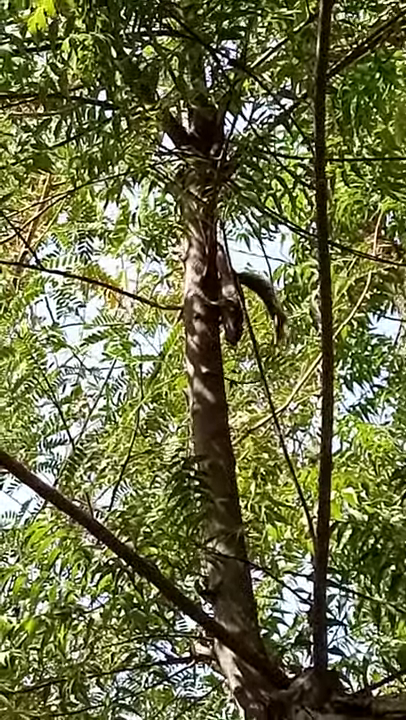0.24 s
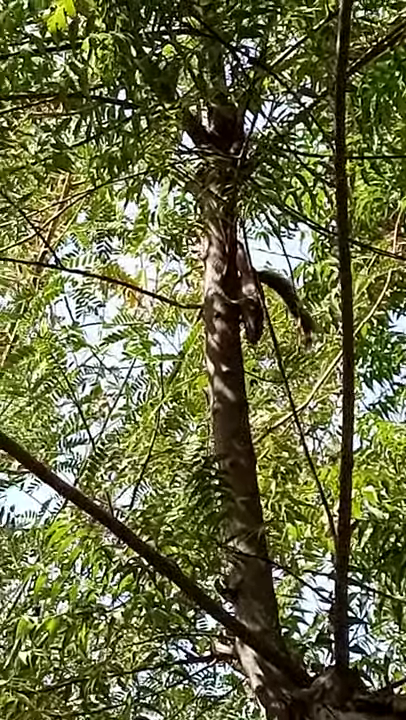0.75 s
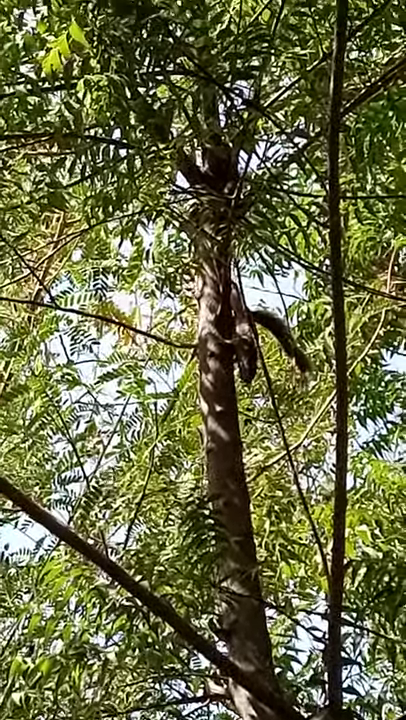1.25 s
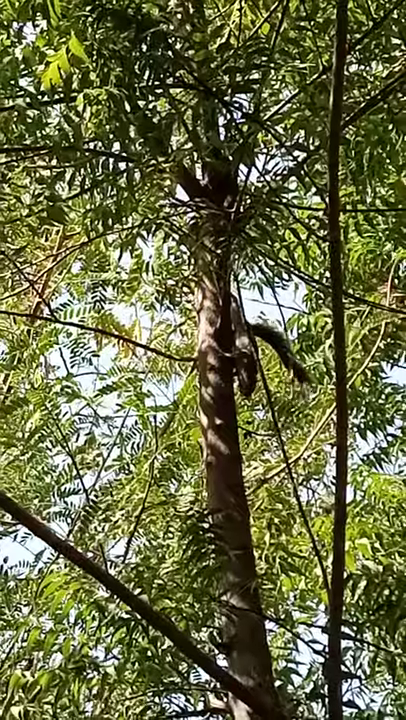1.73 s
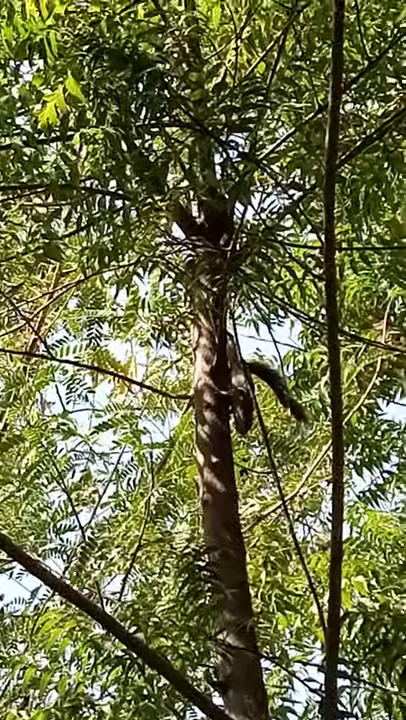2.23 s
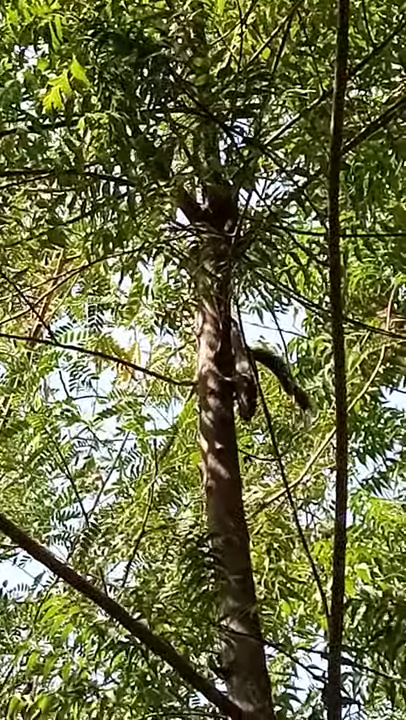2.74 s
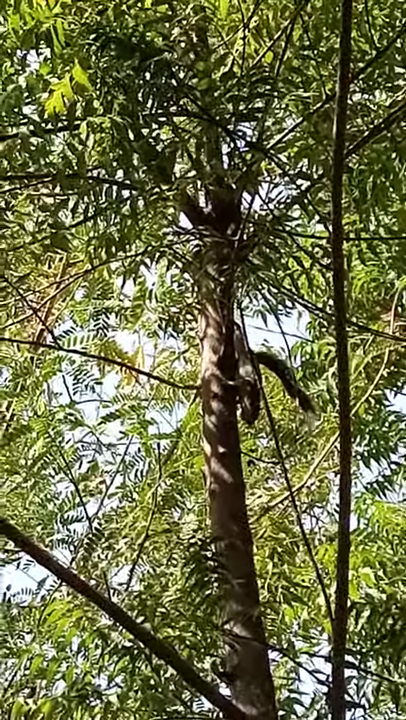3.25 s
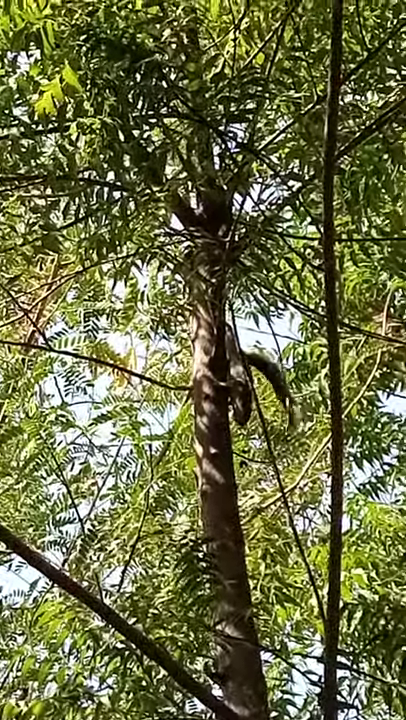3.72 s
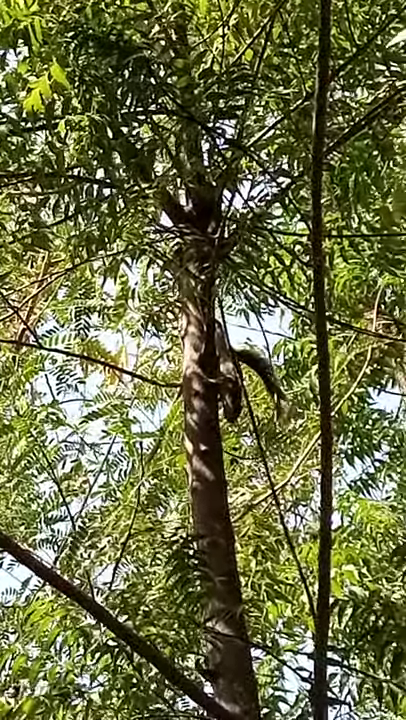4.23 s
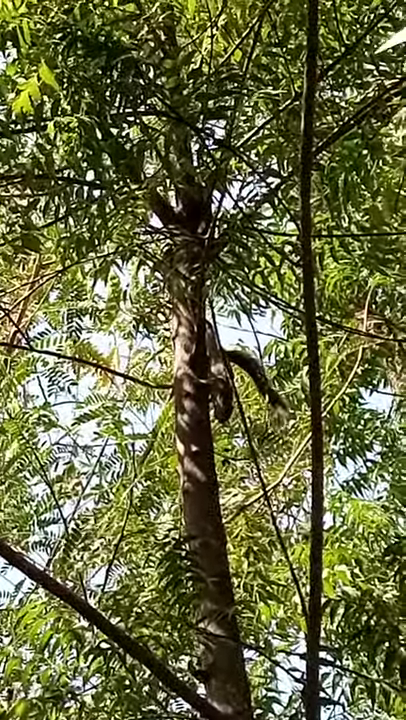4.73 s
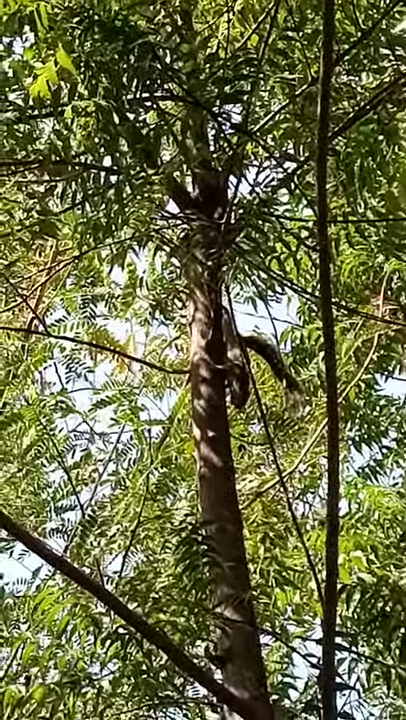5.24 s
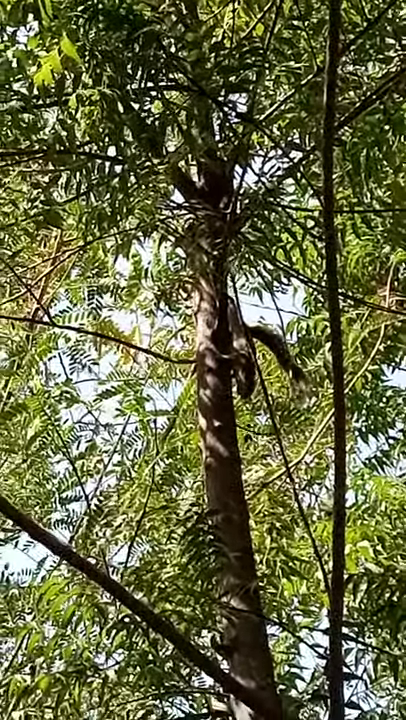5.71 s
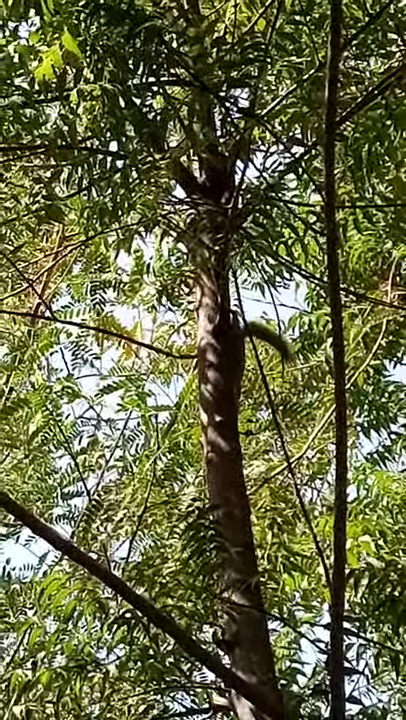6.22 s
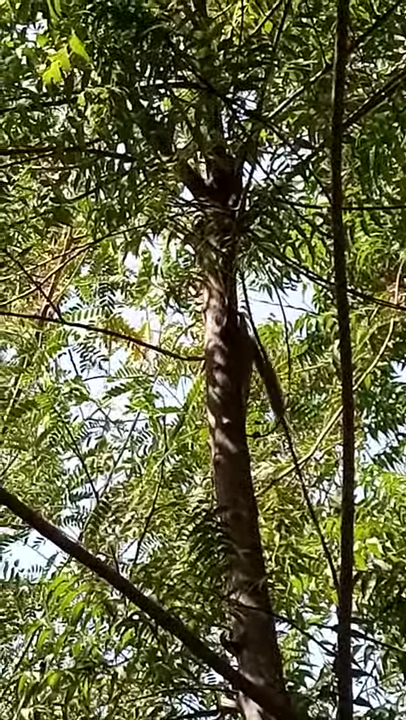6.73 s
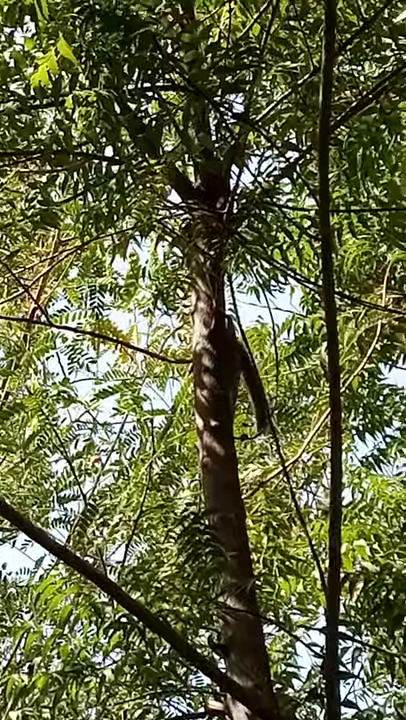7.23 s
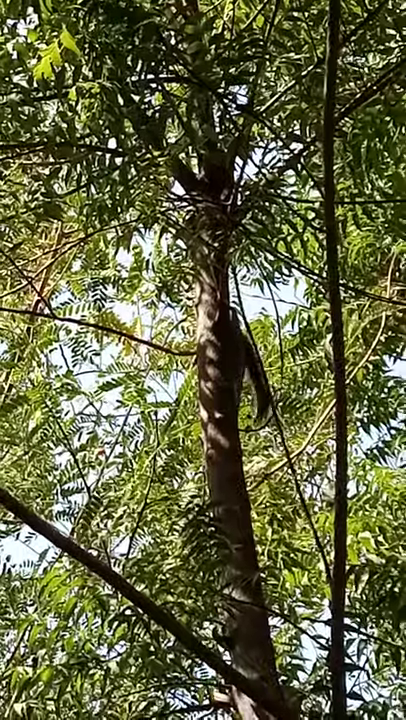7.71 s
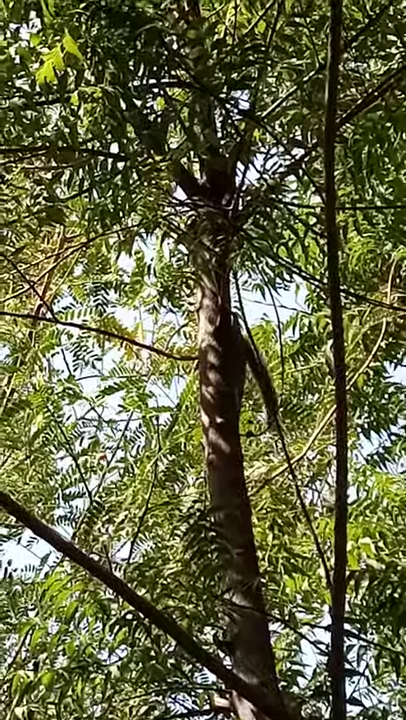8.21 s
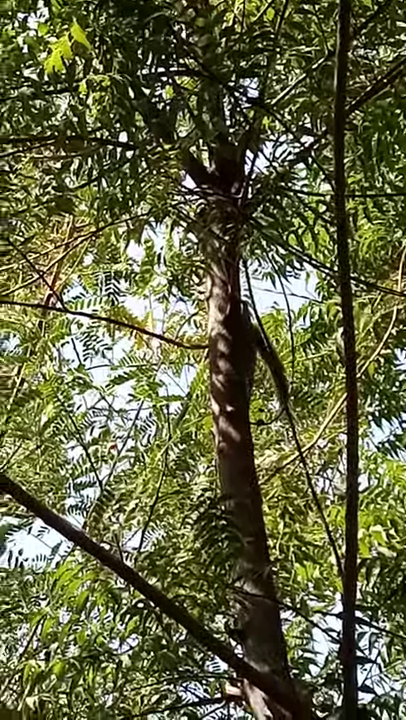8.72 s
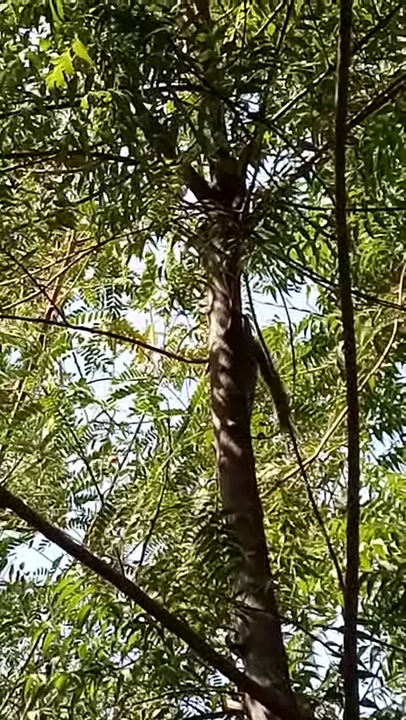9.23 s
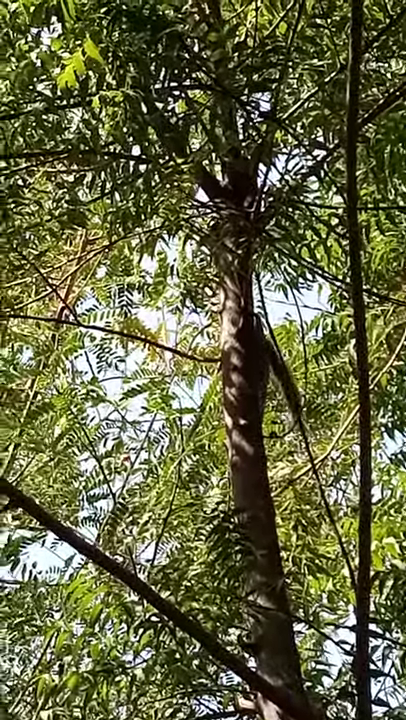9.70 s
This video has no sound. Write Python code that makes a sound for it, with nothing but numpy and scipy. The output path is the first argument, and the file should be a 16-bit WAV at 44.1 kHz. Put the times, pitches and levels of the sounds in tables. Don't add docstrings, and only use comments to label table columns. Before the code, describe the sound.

A squirrel up a tree gives sharp, very high chirps about twice a second while a hoarse bird screeches repeatedly farther off among the trees.

```python
import sys
import numpy as np
from scipy import signal
from scipy.fft import rfft, irfft, next_fast_len
from scipy.io import wavfile
from scipy.ndimage import uniform_filter1d, map_coordinates

SR = 44100
rng = np.random.default_rng(int(sys.argv[2]) if len(sys.argv) > 2 else 0)


def to_wav(sig):
    pcm = np.clip(np.atleast_2d(sig), -1, 1) * 32767
    pcm = np.round(pcm).astype(np.int16)
    wavfile.write(sys.argv[1], SR, pcm.T)


def decibels_to_gain(level_db):
    exponent = np.asarray(level_db, float) / 20
    return 10 ** exponent


N = 439233


def unit(x):
    return x / np.sqrt(np.mean(x ** 2) + 1e-20)


def along(points, hz):
    f, v = np.transpose(points)
    return np.interp(np.log(hz + 1), np.log(f + 1), v)


def wobble(rate, size):
    knots = rng.standard_normal(int(size * rate / SR) + 4)
    return map_coordinates(knots, [np.arange(size) * rate / SR])


def filtered(x, response):
    m = next_fast_len(len(x) + 4096)
    return irfft(rfft(x, m) * response(np.fft.rfftfreq(m, 1 / SR)), m)[:len(x)]


def add(track, s, x):
    part = track[round(s * SR):][:len(x)]
    part += x[:len(part)]


def patchy(depth_db, bins, frames):
    z = signal.stft(rng.standard_normal(N), nperseg=2048, noverlap=1536)[2]
    field = uniform_filter1d(rng.standard_normal(z.shape), size=bins, axis=0)
    field = unit(uniform_filter1d(field, size=frames, axis=1))
    return signal.istft(z * decibels_to_gain(depth_db * field), nperseg=2048, noverlap=1536)[1][:N]


# (time [s], rumble level [dB])
TRAFFIC_LEVEL = [
    (0, -80),
    (2.498, -79),
    (5, -82.5),
    (7.198, -81),
    (8.4, -78.5),
    (9.96, -83),
]
# (frequency [Hz], level [dB per Hz])
TRAFFIC_COLOUR = [(12, -33.5), (32, -11), (59, 2), (160, 3.5), (230, -1.5), (285, -24.5), (400, -17),
                  (520, -34.5), (880, -120)]
# (frequency [Hz], level [dB per Hz])
LEAF_COLOUR = [(150, -23.5), (250, -4.5), (1310, -13), (1610, -17.5), (1850, -11), (4490, -18.5),
               (5830, -8), (6700, -31), (8700, -28), (16000, -46)]


def air():
    s, db = np.transpose(TRAFFIC_LEVEL)
    rumble = unit(filtered(patchy(4.5, bins=2, frames=8), lambda f: decibels_to_gain(along(TRAFFIC_COLOUR, f))))
    hiss = unit(filtered(patchy(4, bins=6, frames=8), lambda f: decibels_to_gain(along(LEAF_COLOUR, f))))
    return decibels_to_gain(np.interp(np.arange(N) / SR, s, db) + 0.5) * rumble + decibels_to_gain(-77) * hiss


# (time [s], level [dB])
GRIP_SHIFTS = [
    (3.002, -56),
    (5.953, -37.5),
    (6.611, -61),
    (8.739, -81.5),
]


def thuds():
    case_hz, t60_s, rise_s = 90, 0.07, 0.008
    out = np.zeros(N)
    t = np.arange(SR // 5) / SR
    for s, db in GRIP_SHIFTS:
        push = decibels_to_gain(db - 60 * t / t60_s) * np.clip(t / rise_s, 0, 1) ** 2
        add(out, s, push * np.sin(2 * np.pi * case_hz * t))
    return out


def cricket():
    period_s, wing_hz, wing_half_width_hz = 0.1325, 5950, 250
    beat = (np.arange(N) / SR + 0.061) / period_s
    faint = beat // 1 % 3 == 2
    burst = np.sin(np.pi * beat) ** 4 * decibels_to_gain(-9 * faint + 2.5 * wobble(1.6, N))
    strokes = rng.standard_normal(N) * decibels_to_gain(3 * wobble(150, N))
    ringing = filtered(strokes, lambda f: 1 / (1 + ((f - wing_hz) / wing_half_width_hz) ** 2))
    return decibels_to_gain(-79.5) * burst * unit(ringing)


# (frequency [Hz], t60 [s])
TREE_T60 = [(1500, .5), (3500, 0.5), (5000, 0.35), (8000, 0.32), (11000, 0.24), (16000, 0.14)]


def among_trees(x, wet_db, near_db, near_t60):
    hz, t, z = signal.stft(rng.standard_normal(SR // 2), SR, nperseg=128)
    decay = decibels_to_gain(-60 * t / along(TREE_T60, hz)[:, None])
    tail = unit(signal.istft(z * decay, SR, nperseg=128)[1])
    u = np.arange(len(tail)) / SR
    near = unit(rng.standard_normal(len(u)) * decibels_to_gain(-60 * u / near_t60))
    onset = np.clip(u / 0.0013, 0, 1)
    answer = (decibels_to_gain(wet_db) * tail + decibels_to_gain(near_db) * near) * onset / np.sqrt(len(u))
    answer[0] = 1
    return signal.fftconvolve(x, answer)


# (start [s], length [s], starting pitch [Hz], level [dB], pitch arch [share])
SCREECHES = [(0.49, 0.32, 1680, -74, .03), (1.22, 0.41, 1600, -72, .09), (1.88, 0.35, 1680, -67, .08),
             (2.47, 0.29, 1750, -64.5, .03), (3.2, 0.34, 1650, -67, .07), (4.0, 0.48, 1570, -66, .15),
             (4.64, 0.28, 1690, -62.5, .01), (5.125, 0.45, 1680, -61.5, .18), (5.77, .2, 1610, -66, .04),
             (6.18, 0.27, 1650, -64, .03), (6.61, .35, 1620, -63, .01), (7.15, 0.26, 1640, -63.5, .02),
             (7.69, 0.3, 1490, -68, .04), (8.24, .26, 1520, -68.5, .02), (8.72, 0.27, 1520, -68, .03),
             (9.34, .22, 1510, -69, .01)]
# (frequency [Hz], level [dB])
BEAK_COLOUR = [(650, -62), (1100, -28), (1370, -7.5), (1630, -8), (2120, -11.5), (2520, -12), (3330, 1),
               (4900, -2.5), (5550, -15), (6540, -12), (7060, -20), (9710, -25.5), (11000, -35.5),
               (14300, -78), (22000, -120)]


def bird():
    attack_s, release_s, edge_db = 0.025, 0.07, -19
    usual_db, treble_per_db = -68.5, 0.43
    out = np.zeros(N)
    for s, length, hz, db, arch in SCREECHES:
        t = np.arange(0, length + release_s, 1 / SR)
        glide = hz * (1 + arch * np.sin(np.pi * t / t[-1]))
        pitch = glide * (1 + 0.07 * wobble(300, len(t)) + 0.025 * wobble(40, len(t)))
        phase = 2 * np.pi * np.cumsum(pitch) / SR
        rasp = decibels_to_gain(2.2 * wobble(180, len(t)))
        overtones = sum(np.sin(k * phase) / k for k in range(2, 7))
        breath = 1.5 * (1 + np.sin(phase)) * rng.standard_normal(len(t))

        def bright_beak(f):
            tilt_db = treble_per_db * (db - usual_db) * np.log2(f / 4000 + 0.01)
            return decibels_to_gain(along(BEAK_COLOUR, f) + tilt_db) * (f > 2100)

        low = unit(filtered(rasp * np.sin(phase), lambda f: decibels_to_gain(along(BEAK_COLOUR, f))))
        high = unit(filtered(rasp * (overtones + breath), bright_beak))
        effort_db = np.interp(t, [0, attack_s, length - release_s, t[-1]], [edge_db, 0, 0, edge_db])
        effort_db = effort_db + 0.87 * wobble(5, len(t))
        call = decibels_to_gain(db + effort_db - 5.5) * (low + decibels_to_gain(9) * high)
        add(out, s, among_trees(call, wet_db=-2, near_db=-6.5, near_t60=0.2))
    return out


def pair(f, hz, width, notch_hz, notch_width):
    return (notch_hz ** 2 - f * f + 1j * f * notch_width) / (hz ** 2 - f * f + 1j * f * width)


# (multiple of the pitch, level [dB])
FOLD_OVERTONES = [(2, -5), (3, -10.5), (4, -9)]


def whistle(rows, throat, scale, overtone_db, pressed_s=0.0096):
    s, hz, db = np.transpose(rows)
    t = np.arange(s[0], s[-1] + 0.0068, 1 / SR)
    pitch = uniform_filter1d(np.interp(t, s, hz), size=24)
    phase = 2 * np.pi * np.cumsum(pitch) / SR
    pressed = 1 / (1 + ((t - s[0]) / pressed_s) ** 6)
    folds = np.sin(phase)
    for k, level_db in FOLD_OVERTONES:
        folds += pressed * decibels_to_gain(level_db + overtone_db) * np.sin(k * phase) * (k * pitch < 19000)
    folds *= decibels_to_gain(np.interp(t, s, db) + 0.9 * wobble(500, len(t))) * (t < s[-1])

    def throat_and_mouth(f):
        tube = np.prod([pair(f, scale * c, w, scale * notch, wide) for c, w, notch, wide in throat], axis=0)
        return tube * (1j * f / (2500 + 1j * f)) ** 2 / (1 + (1750 / (f + 1)) ** 12)

    return filtered(folds, throat_and_mouth)


# (time [s], peak level [dB], top pitch [Hz], throat scale)
TRILL_NOTES = [
    (5.4281, -41, 14000, 1.1),
    (5.514, -43.5, 13900, 1.01),
    (5.597, -42, 14240, .99),
    (5.687, -42.5, 14320, 1),
    (5.790, -42, 14420, 1.01),
    (5.888, -42.5, 14200, 0.98),
    (6.164, -43.5, 14220, 1.015),
]
# (time [ms], share of top pitch)
NOTE_PITCH = [(-4, .2), (-1.5, .255), (1, .29), (3, .45), (5.5, .62), (15, .96), (28, 1), (35, .64),
              (41, .3)]
NOTE_EFFORT = [-24.5, 0.5, -4.5, -11.5, 3, -12.5, -8, -7.5, -18.5]
# (time [s], pitch [Hz], effort [dB])
BARK_SWEEPS = [
    [(5.947, 1850, -50), (5.9525, 3900, -29), (5.956, 4410, -21.5), (5.9585, 8300, -26), (5.961, 9270, -21),
     (5.970, 9050, -26.5), (5.9735, 5600, -38.5), (5.976, 4100, -28.5), (5.979, 3295, -50)],
    [(6.019, 2200, -50), (6.0245, 3610, -24.5), (6.0295, 8000, -36.5), (6.0345, 9000, -28),
     (6.0375, 10340, -34), (6.042, 9100, -24.5), (6.046, 8500, -24.5), (6.0505, 4900, -32),
     (6.056, 4300, -32)],
]
# (resonance [Hz], width [Hz], notch [Hz], notch width [Hz])
NEIGHBOUR_THROAT = [(3900, 380, 4280, 530), (8970, 780, 10060, 1200)]


def neighbour():
    out = np.zeros(N)
    for s, db, top, scale in TRILL_NOTES:
        rows = [(ms / 1000, share * top, db + e) for (ms, share), e in zip(NOTE_PITCH, NOTE_EFFORT)]
        note = whistle(rows, NEIGHBOUR_THROAT, scale, overtone_db=-23.5)
        note = note + decibels_to_gain(-10.5) * np.roll(note, round(0.0052 * SR))
        add(out, s + rows[0][0], among_trees(note, wet_db=-6, near_db=-4, near_t60=0.059))
    for rows in BARK_SWEEPS:
        bark = whistle(rows, NEIGHBOUR_THROAT, 1.05, overtone_db=-5.5, pressed_s=0.046)
        add(out, rows[0][0], among_trees(bark, wet_db=-12.5, near_db=-4, near_t60=0.19))
    return out


# (time of crossing the first throat resonance [s], effort [dB], top pitch [Hz], time from that
# crossing to falling through about 7 kHz [ms], throat scale)
CHIRP_CALLS = [(0.1665, -14, 13500, 30.5, 1.055), (0.5672, -13, 12900, 30, 1.049),
               (0.958, -15.5, 13000, 32.25, 1.057), (1.5895, -14, 12300, 28, 1.034),
               (2.0542, -14, 13000, 32.25, 1.036), (2.5053, -14.5, 13400, 32.25, 1.053),
               (2.9195, -13, 13500, 31.25, 1.052), (3.329, -14.5, 12900, 30, 1.058),
               (3.7468, -12.5, 12700, 27.75, 1.028), (4.1952, -13.5, 13300, 32, 1.045),
               (4.594, -14.5, 13100, 32, 1.032), (4.9955, -14, 12700, 31.25, 1.05),
               (5.445, -13.5, 13000, 32, 1.032), (6.6012, -12.5, 10110, 24.25, 0.942),
               (7.1408, -14, 11400, 25.75, 0.98), (7.6352, -15, 11900, 28, 0.99),
               (8.1063, -15, 11700, 26, 1.005), (8.536, -14.5, 12900, 29.75, 1.004),
               (9.1005, -14, 12100, 26.75, 0.99), (9.5592, -13.5, 12000, 26.5, 0.99)]
# (time [ms], pitch [Hz])
CLIMB_PITCH = [(-8.5, 1850), (-4, 2250), (-2.6, 3300), (-.3, 4450), (1.2, 5150), (2, 6500), (3.2, 8900)]
CLIMB_EFFORT = [-25, -11, -12, -2.5, -7.5, -13.5, -2.5]
# (time from falling through about 7 kHz [ms], pitch [Hz], effort [dB])
DROP = [(-7.5, 8900, -13.5), (-4.5, 23000, -7.5), (0.5, 7000, -13), (4.5, 3000, -14), (4.5, 3900, -35)]
# (resonance [Hz], width [Hz], notch [Hz], notch width [Hz])
SQUIRREL_THROAT = [(4523, 736, 3370, 4700), (10060, 600, 10740, 2200)]


def squirrel():
    out = np.zeros(N)
    for s, db, top, fall, scale in CHIRP_CALLS:
        tightness = scale - 1
        shelf_ms, shelf_hz, shelf_db = 11 - 20.5 * tightness, min(10570 * scale, top), -2 + 30.5 * tightness
        arch_db = -4 - 0.5 * (fall - 30)
        span = fall - shelf_ms
        rows = [(ms, hz * scale, e) for (ms, hz), e in zip(CLIMB_PITCH, CLIMB_EFFORT)]
        rows += [(shelf_ms, shelf_hz, shelf_db)]
        rows += [(shelf_ms + 1.2, 0.96 * top, arch_db),
                 (shelf_ms + 0.33 * span, top, arch_db),
                 (shelf_ms + 0.55 * span, 0.96 * top, arch_db)]
        rows += [(fall + ms, min(hz, 0.92 * top), arch_db + e) for ms, hz, e in DROP]
        rows = [(ms / 1000, hz, db + e - 13.5) for ms, hz, e in rows]
        chirp = whistle(rows, SQUIRREL_THROAT, scale, overtone_db=1.5)
        add(out, s + rows[0][0], among_trees(chirp, wet_db=-15, near_db=-6, near_t60=0.14))
    return out


def scene():
    mix = air() + thuds() + cricket() + bird() + neighbour() + squirrel()
    return np.tile(mix, (2, 1))


def band_limit(x):
    return signal.sosfilt(signal.butter(12, 17130, fs=SR, output="sos"), x)


def record(dry):
    port_hz, port_width_hz, top_hz = 15300, 1300, 16000

    def microphone(f):
        ring = 1j * f * port_width_hz / (port_hz ** 2 - f * f + 1j * f * port_width_hz)
        return (1 + decibels_to_gain(18) * ring ** 2) / (1 + (f / top_hz) ** 90)

    heard = filtered(dry[0], microphone)
    return band_limit(np.tile(heard, (2, 1)))


dry = scene()
out = record(dry)
to_wav(out)
```